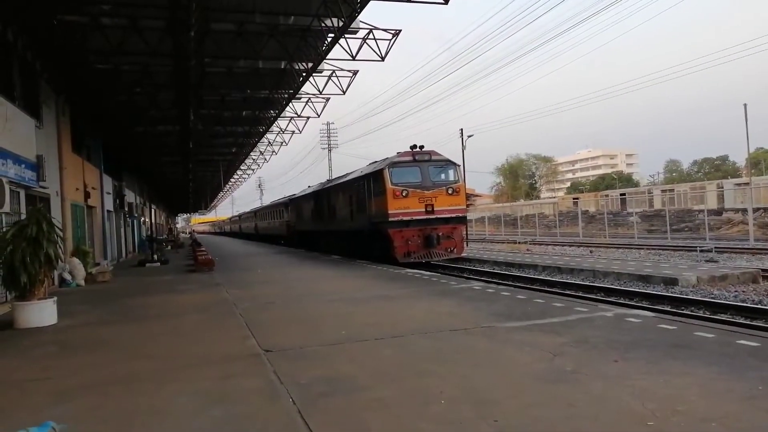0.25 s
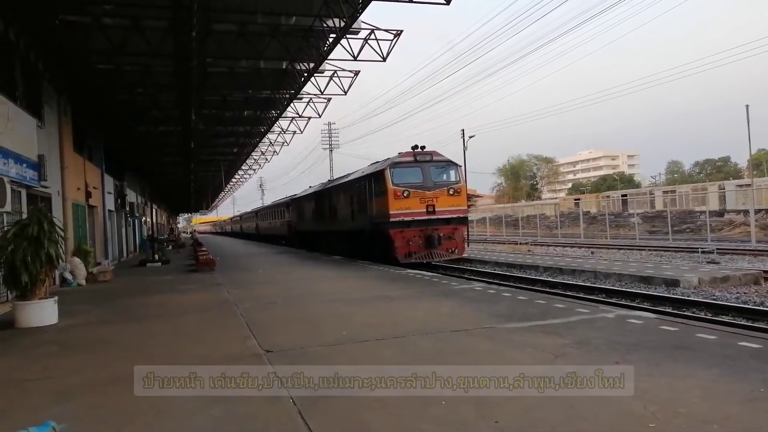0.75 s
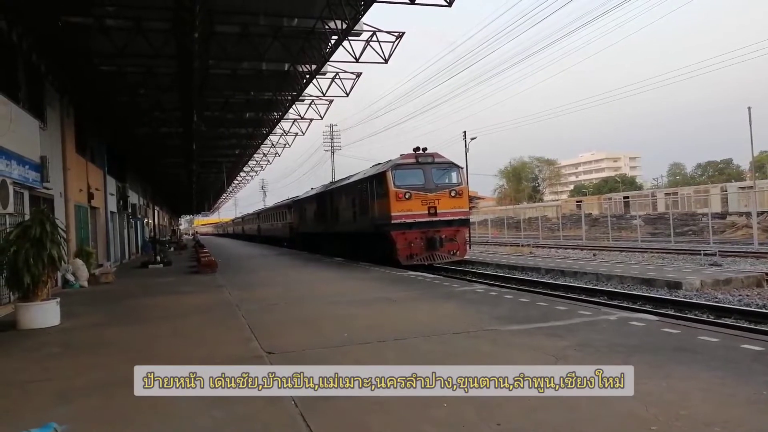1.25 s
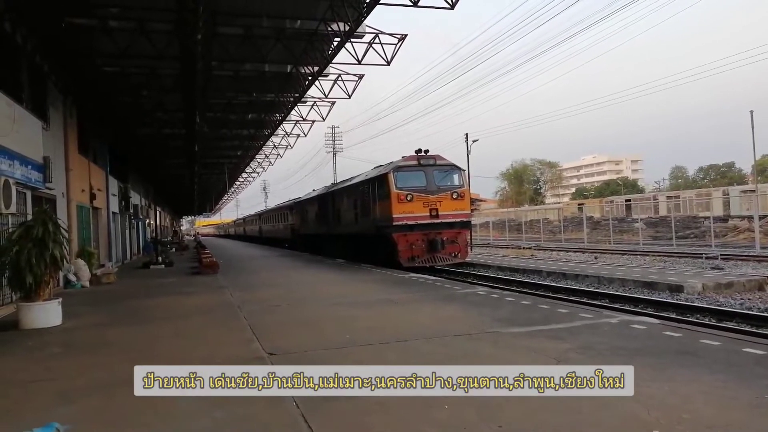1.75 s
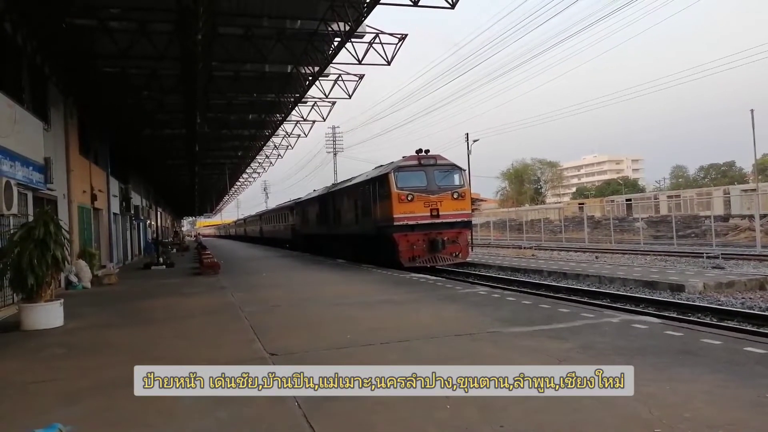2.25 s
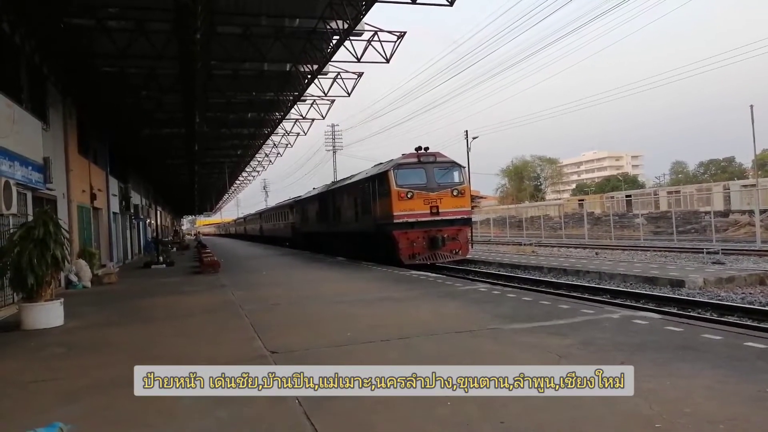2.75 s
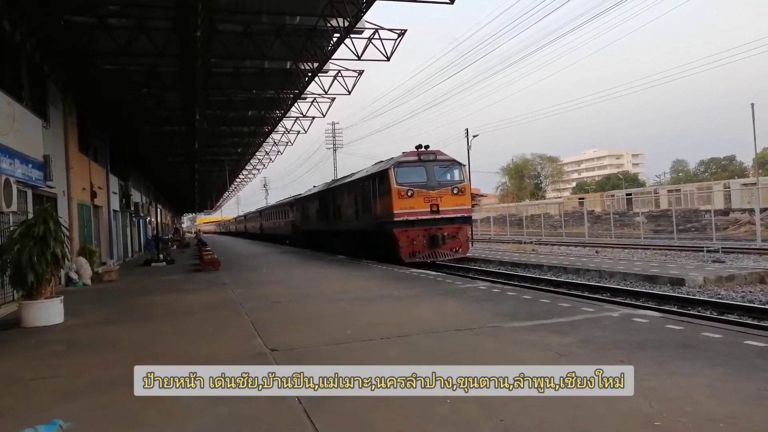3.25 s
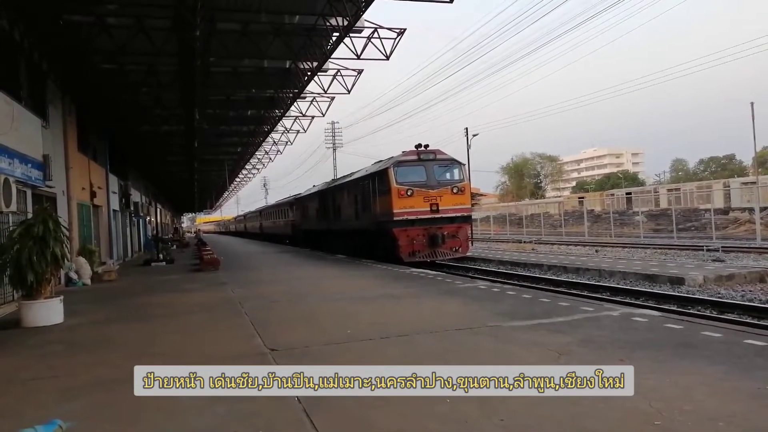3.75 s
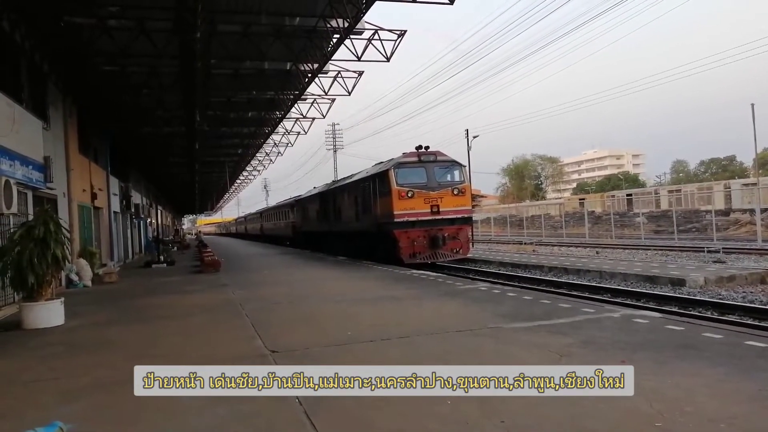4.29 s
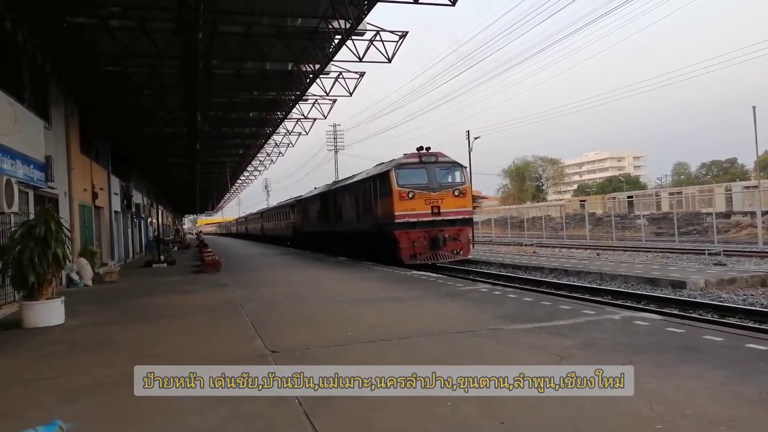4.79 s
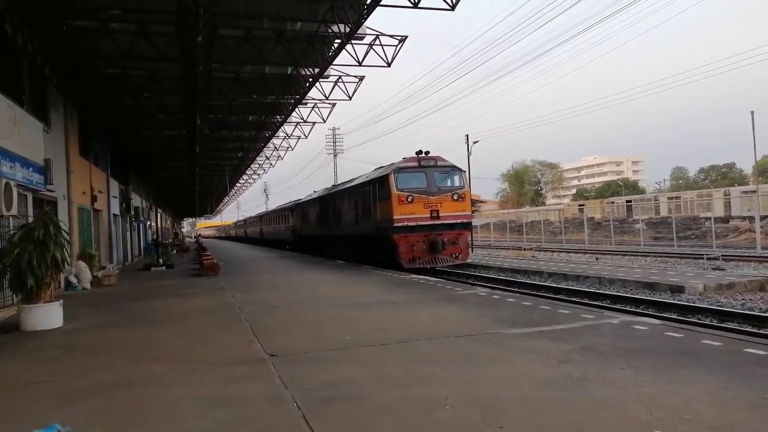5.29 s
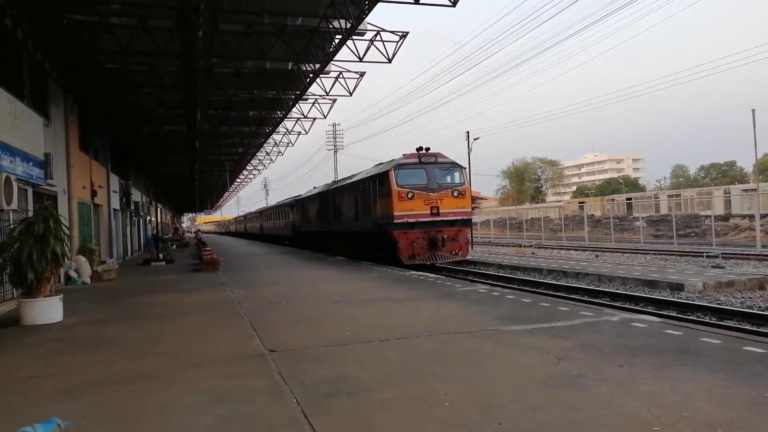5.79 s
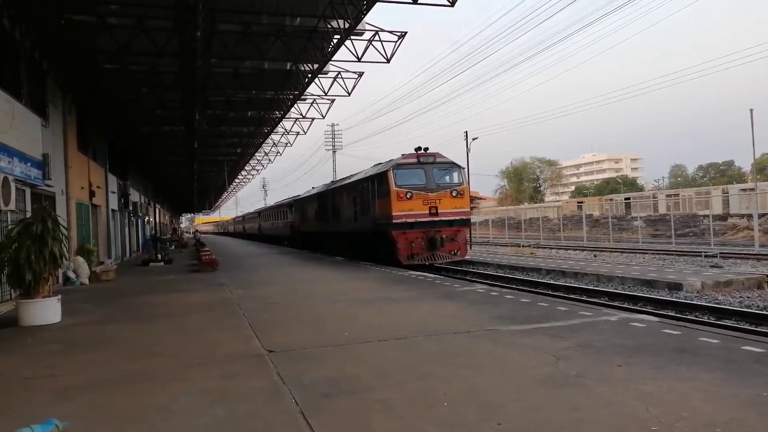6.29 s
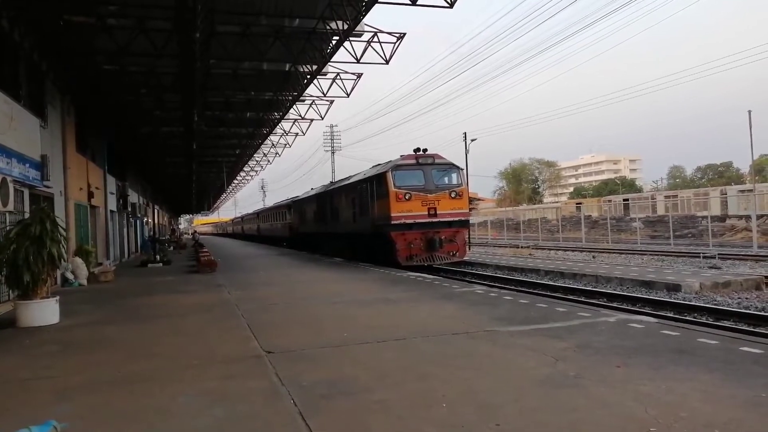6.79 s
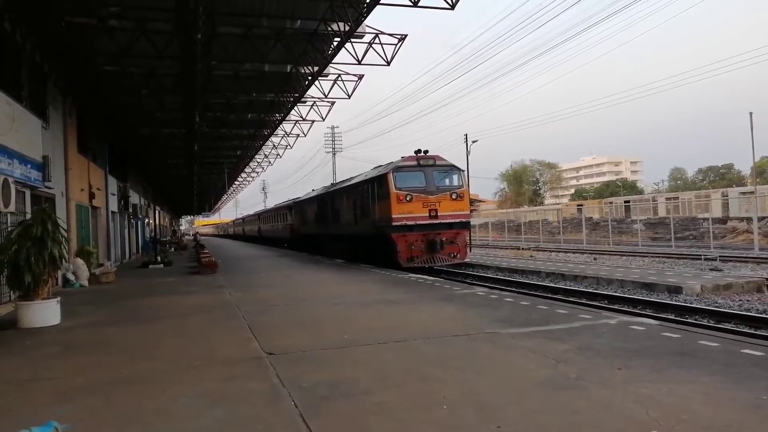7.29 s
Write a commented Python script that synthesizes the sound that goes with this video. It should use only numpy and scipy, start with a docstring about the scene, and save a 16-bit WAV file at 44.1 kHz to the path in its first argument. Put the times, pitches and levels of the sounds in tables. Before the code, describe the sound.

Loud locomotive horn bends down in pitch and breaks off ringing; a diesel engine rumbles slowly closer, air valve spitting, then revving with a thin whine.

```python
"""A loud air horn, already sounding, goes flat twice, breaks off and rings on under a station roof.
The recorder's gain, held down by the horn, recovers; a sixteen-cylinder diesel-electric locomotive throbs
through, rolling slowly nearer, and begins to speed up. An air valve spits three times, once faintly; air
leaks; a thin whine sets in. Horn: summed partials. Engine: filtered pulses and noise, with gear tones.
Air: shaped noise and breathy tones. Whine: narrow noise bands."""
import sys
import numpy as np
from scipy import signal
from scipy.fft import rfft, irfft, next_fast_len
from scipy.io import wavfile
from scipy.ndimage import uniform_filter1d, minimum_filter1d, map_coordinates

SR = 44100
rng = np.random.default_rng(int(sys.argv[2]) if len(sys.argv) > 2 else 0)


def wav_out(sig):
    """Save sig, one row per channel (or a flat mono array), as 16-bit PCM at SR to the path in sys.argv[1]."""
    wavfile.write(sys.argv[1], SR, np.round(np.clip(np.atleast_2d(sig).T, -1, 1) * 32767).astype(np.int16))


N = 332514
TIME = np.arange(N) / SR

# Table levels are relative; the functions apply further gains.
# roof reverberation: hz, t60_s
ROOF_T60 = [(620, 0.74), (1200, 1), (2000, 0.9), (4300, 0.6), (8000, 0.41), (14000, 0.2)]
# right microphone against the left: hz, gain_db, lag_ms
RIGHT_MIC = [(49.4, 1, .4), (94, 0.4, 0.52), (203, 1, 0.68), (304, -1.5, 0.91), (356, -0.5, 0.73),
             (596, -6, 0.75), (663, -12, 0.49), (1260, -9, 0.76), (2030, -16.5, 0.62), (3020, -19.5, 0.66),
             (5030, -22, 0.55), (8250, -28.5, 0.68), (11700, -34, 0.073)]

# valve outlet noise: hz, level_db_per_hz
SPIT_HISS = [(1500, -86), (2600, -78), (3400, -66.5), (4500, -68.5), (5600, -79), (7000, -67.5),
             (8200, -67), (9500, -72.5), (11000, -81.5), (13000, -86), (14500, -100)]
# valve spits: start_s, level_db, opening_s, hold_s, t60_s, pipe_ring_db, chirp_db
SPITS = [(2.113, -0.5, 0.009, 0.064, 0.7, 5, -9), (5.33, -13, .06, .07, .5, -14, -20),
         (5.925, -2.5, 0.004, 0.036, 0.77, -11, 0.5)]
# outlet pipe resonances: hz, gain_db
PIPE_RINGS = [(3470, -51), (3810, -43), (4530, -41), (5480, -50)]
# valve seat chirp as it snaps open: hz, gain_db, width_hz
SEAT_CHIRP = [(3540, -27, 330), (7200, -37, 800), (11300, -37, 600)]
# air leak noise: hz, level_db_per_hz
LEAK_HISS = [(2000, -82), (3400, -85), (4500, -78.5), (5600, -81.5), (7000, -80), (8200, -82.5),
             (9500, -86.5), (11000, -99), (13000, -103), (14500, -105)]
# faint leak whistles: hz, gain_db
LEAK_WHISTLES = [(1130, -38), (8000, -52.5), (9600, -54)]

# cylinders in firing order: strength_db, manifold_lag_ms
CYLINDERS = [(-0.2, 3.9), (2.3, -0.2), (-4.3, 5.1), (1.5, 3.8), (1.0, -1.4), (0.3, 1.0), (2.1, 3.9),
             (-7.1, 3.4), (1.2, 5.9), (1.6, -0.7), (-15.0, 4.5), (-16.2, 5.7), (0.4, 3.8), (-8.3, 3.6),
             (-3.3, 0.5), (0.0, 4.1)]
# spectrum of one exhaust pulse: hz, gain_db
EXHAUST_PULSE = [(12.0, -70), (25.0, -48), (47.0, -35), (75.0, -30), (95.0, -17), (125.0, -30),
                 (160.0, -33.5), (210.0, -50), (280.0, -50), (400.0, -55), (700, -79)]
# turbulent exhaust gas: hz, level_db_per_hz
EXHAUST_GAS = [(12, -78), (25, -63), (45, -48), (60, -51.5), (75, -43.5), (100, -49.5), (140, -50.5),
               (200, -56), (300, -61), (500, -74)]
# fans, gears and engine casing: hz, level_db_per_hz
MACHINERY = [(120, -56.5), (250, -52), (350, -54), (430, -60), (520, -65), (650, -60.5), (900, -59.5),
             (1300, -65.5), (1850, -59), (2500, -63.5), (3100, -75), (4000, -74), (5300, -83.5),
             (9300, -87.5), (10500, -99), (14000, -116)]
# gear train tones: multiple_of_firing_rate, level_db
GEARS = [(4.315, -46.5), (3.0, -50.5)]
# deepest rumble: time_s, gain_db
DEEP_RUMBLE = [(0, -12), (1.7, 0), (2.7, 0.5), (4.2, -4), (4.9, -6.5), (5.6, -4), (6.4, -2.5), (7.5, -2)]
# exhaust surges: peak_s, level_db, half_length_s
SURGES = [(1.613, 0.5, 0.25), (4.204, 2, 0.048), (6.442, 3.5, 0.057), (6.912, 4, 0.16)]
# booms at the octave of the firing rate: peak_s, level_db, half_length_s
BOOMS = [(1.388, -33, 0.11), (2.813, -30, 0.52), (5.454, -31.5, 0.39)]

# horn partials at full pressure: multiple, level_db
HORN_PARTIALS = [(1, -13), (2, -26.5), (3, -16.3), (4, -17.5), (5, -30), (6, -26), (7, -17), (8, -33),
                 (9, -43), (10, -48), (11, -39), (12, -40.5), (13, -50), (14, -47), (15, -47), (16, -52),
                 (17, -54), (18, -60), (19, -63), (20, -59), (21, -70), (22, -68), (23, -64)]
# timbre change at low pressure: hz, change_db
HORN_SLACK = [(620, 2), (1240, 2), (1860, 1), (2480, -11), (3100, -12), (3720, 0), (4340, -10.5),
              (5000, -10), (5600, 0), (6200, -3), (6820, -13), (7440, -3), (8060, 8), (8680, -14),
              (9300, -2), (11000, -3), (14000, 4)]
# timbre change as the reed stalls: hz, change_db
HORN_STALL = [(620, 6.5), (1240, 11.5), (1860, 4), (2480, 20), (3100, 29), (3720, -2), (4340, 1), (5600, 4),
              (7500, 9), (14000, 9.5)]
# air rushing through the horn: hz, level_db_per_hz
HORN_AIR = [(300, -99), (700, -71), (1300, -73.5), (2000, -65), (3300, -72.5), (4300, -71), (6000, -74.5),
            (8000, -73), (9500, -83.5), (10500, -102), (14000, -107)]
# spells of throttled horn air: start_s, end_s
THROTTLED = [(0.508, .648), (.863, 1.2)]
# horn returned by distant buildings: delay_s, level_db, loss_db_per_octave
FAR_ECHOES = [(.64, -42, 4), (1.12, -52, 12), (1.46, -45, 14)]

WHINE_START_S, WHINE_ATTACK_S, WHINE_DB = 6.95, 0.43, -32.5
WHINE_HZ, WHINE_FALL_HZ_PER_S = 7370, 480

RING_T60_S = 0.95
CHIRP_PEAK_S, CHIRP_HALF_LENGTH_S = 0.012, 0.013  # peak is after valve opening
LEAK_START_S, LEAK_ATTACK_S, LEAK_DB, LEAK_FADE_DB_PER_S = 5.11, 0.29, 2.5, 5

# engine: firings per s, then their steady increase
IDLE_FIRINGS_PER_S, SPEED_UP_START_S, SPEED_UP_FIRINGS_PER_S2 = 94.16, 6.38, 6.8
# growth while nearing, and per extra firing per s
EXHAUST_DB, EXHAUST_NEARING_DB_PER_S, EXHAUST_DB_PER_RATE = -0.46, 0.018, 0.62
MACHINERY_DB, MACHINERY_NEARING_DB_PER_S, MACHINERY_DB_PER_RATE = -1.72, 0.2, 0.21
# share of a surge in the machinery; extra share in the deepest rumble
SURGE_MACHINERY_SHARE, SURGE_DEEP_SHARE = 0.28, 1.2

HORN_HZ, HORN_DB, UNDERTONE_DB = 620.1, 21.5, -56.5
# throttled air: pitch sinks ever more slowly, then springs back
SAG_LIMIT_HZ, DRAIN_S, REFILL_S = 97, 0.45, 0.032
WEAK_BELOW_SAG_HZ, WEAK_DB_PER_HZ = 20.5, 1.13  # the reed weakens beyond this flatness
STALL_S, STALL_LENGTH_S = 0.943, 0.11
# last break: pitch drops, partials near one pitch yelp, the horn stops
BREAK_S, BREAK_RISE_S, BREAK_DROP_HZ = 1.114, 0.017, 18.4
YELP_DB, YELP_HZ, YELP_FALL_DB_PER_OCTAVE = 21.5, 1520, 32
STOP_S, STOP_DB_PER_S = 1.143, 898
# flutter at low pressure; depth is full from the given multiple up
FLUTTER_DB, FLUTTER_PER_S, FLUTTER_FULL_MULTIPLE = 5, 22, 9
# ragged station wall
WALL_DELAY_S, WALL_DB, WALL_T60_S, WALL_LOSS_DB_PER_OCTAVE = 0.27, -23, 0.36, 2.5

CUTOFF_HZ = 15000


def from_db(db):
    """Decibels to amplitude gain."""
    return 10 ** (np.asarray(db) / 20)


def at_hz(points, hz, axis=1):
    """Interpolate a table column on a log-frequency axis."""
    points = np.array(points)
    return np.interp(np.log(np.maximum(hz, 1)), np.log(points[:, 0]), points[:, axis])


def ramp(start_s, length_s, t=TIME):
    """Straight rise from 0 to 1."""
    return np.clip((t - start_s) / length_s, 0, 1)


def swell(peak_s, half_length_s):
    """Gaussian bump of height 1."""
    return np.exp(-((TIME - peak_s) / half_length_s) ** 2)


def coloured(x, spectrum):
    """Filter by a spectrum that falls 24 dB per octave further beyond its ends."""
    size = next_fast_len(len(x) + 8192)
    hz = np.maximum(np.arange(size // 2 + 1) * SR / size, 1)
    ends = np.minimum(1, np.minimum(hz / spectrum[0][0], spectrum[-1][0] / hz)) ** 4
    gain = from_db(at_hz(spectrum, hz)) * ends
    return irfft(rfft(x, size) * gain, size)[:len(x)]


def noise(spectrum):
    """Gaussian noise shaped to the given level per Hz."""
    return coloured(rng.standard_normal(N) * np.sqrt(SR / 2), spectrum)


def drift(rate_per_s, size=N):
    """Smooth random curve of spread 1, splined through two knots per cycle of the rate."""
    knots = rng.standard_normal(int(size / SR * 2 * rate_per_s) + 4)
    position = np.arange(size) / SR * 2 * rate_per_s
    slow = map_coordinates(knots, [position], order=3, mode="nearest")
    return slow / slow.std()


def narrow_tone(hz, width_hz):
    """Breathy tone: a carrier with wandering strength and phase, rms about 0.71."""
    phase = 2 * np.pi * np.cumsum(hz * np.ones(N)) / SR
    in_phase = drift(width_hz / 2) * np.cos(phase)
    quadrature = drift(width_hz / 2) * np.sin(phase)
    return (in_phase + quadrature) / np.sqrt(2)


def roof_echo(tone, hz, first_s=0.013):
    """Dense decaying reflections under the roof, as a unit-energy noise response."""
    t = np.arange(2 * SR) / SR
    decay = from_db(-60 * t / at_hz(ROOF_T60, hz))
    response = rng.standard_normal(len(t)) * decay * (t > first_s)
    return signal.fftconvolve(tone, response / np.linalg.norm(response))[:len(tone)]


def wall_echo(tone):
    """Late, smeared cluster of wall reflections that swells and dies, unit energy."""
    t = np.arange(SR // 2) / SR
    response = rng.standard_normal(len(t)) * t * from_db(-60 * t / WALL_T60_S)
    response = np.pad(response / np.linalg.norm(response), (int(WALL_DELAY_S * SR), 0))
    return signal.fftconvolve(tone, response)[:len(tone)]


def whine(width_hz=420, skirt_hz=850, skirt_db=-5):
    """Narrow hiss band with soft skirts; swells, then slides down as the locomotive nears."""
    hz = WHINE_HZ - WHINE_FALL_HZ_PER_S * np.maximum(TIME - WHINE_START_S, 0)
    band = narrow_tone(hz, width_hz) + from_db(skirt_db) * narrow_tone(hz, skirt_hz)
    return from_db(WHINE_DB) * ramp(WHINE_START_S, WHINE_ATTACK_S) * band


def valve_spits(sputter_db=1.0, ring_width_hz=150):
    """A valve snaps open with a chirp, blows briefly and runs empty while its outlet pipe rings on."""
    blast, ringing, snap = 0, 0, 0
    for start_s, level_db, opening_s, hold_s, t60_s, ring_db, chirp_db in SPITS:
        opened = from_db(level_db) * ramp(start_s, opening_s)
        emptying_s = np.maximum(TIME - start_s - hold_s, 0)
        blast = blast + opened * from_db(-60 * emptying_s / t60_s)
        ringing = ringing + opened * from_db(ring_db - 60 * emptying_s / RING_T60_S)
        click = swell(start_s + CHIRP_PEAK_S, CHIRP_HALF_LENGTH_S)
        snap = snap + opened * from_db(chirp_db) * click
    rings = sum(from_db(db) * narrow_tone(hz, ring_width_hz) for hz, db in PIPE_RINGS)
    chirp = sum(from_db(db) * narrow_tone(hz, width_hz) for hz, db, width_hz in SEAT_CHIRP)
    sputter = from_db(sputter_db * drift(30))
    return sputter * (blast * noise(SPIT_HISS) + ringing * rings) + snap * chirp


def air_leak(whistle_width_hz=110):
    """Leaking air hisses and whistles faintly, opening and then losing pressure."""
    whistles = sum(from_db(db) * narrow_tone(hz, whistle_width_hz) for hz, db in LEAK_WHISTLES)
    fading_s = np.maximum(TIME - LEAK_START_S - LEAK_ATTACK_S, 0)
    flow = ramp(LEAK_START_S, LEAK_ATTACK_S) * from_db(LEAK_DB - LEAK_FADE_DB_PER_S * fading_s)
    return flow * (noise(LEAK_HISS) + whistles)


def firing_pulses(firings, rate_per_s, uneven_db=1.18, jitter_s=0.00027):
    """One impulse per firing, uneven by cylinder and chance; also firing samples and strengths."""
    at = np.flatnonzero(np.diff(np.floor(firings)))
    number = np.arange(1, len(at) + 1)
    strength_db, lag_ms = np.array(CYLINDERS)[number % len(CYLINDERS)].T
    chance = rng.standard_normal((len(at), 2))
    delay_s = lag_ms / 1000 + jitter_s * chance[:, 0]
    when = np.clip(at + (SR * delay_s).astype(int), 0, N - 1)
    pulses = np.zeros(N)
    # dividing by the rate keeps the mean flow steady
    pulses[when] = from_db(strength_db + uneven_db * chance[:, 1]) * SR / rate_per_s[at]
    return pulses, at, strength_db


def engine(gas_throb=0.092, casing_flutter_db=0.51, start_firings=0.3, deep_hz=52):
    """Exhaust pulses lope with weak and strong cylinders, over gas and machinery noise and gear tones."""
    extra_rate = SPEED_UP_FIRINGS_PER_S2 * np.maximum(TIME - SPEED_UP_START_S, 0)
    rate_per_s = IDLE_FIRINGS_PER_S + extra_rate
    firings = np.cumsum(rate_per_s) / SR + start_firings
    surge_db = sum(db * swell(peak_s, half_s) for peak_s, db, half_s in SURGES)
    exhaust_db = EXHAUST_DB + EXHAUST_NEARING_DB_PER_S * TIME
    exhaust_db = exhaust_db + EXHAUST_DB_PER_RATE * extra_rate + surge_db
    machinery_db = MACHINERY_DB + MACHINERY_NEARING_DB_PER_S * TIME
    machinery_db = machinery_db + MACHINERY_DB_PER_RATE * extra_rate + SURGE_MACHINERY_SHARE * surge_db
    deep_db = np.interp(TIME, *np.transpose(DEEP_RUMBLE)) + SURGE_DEEP_SHARE * surge_db

    pulses, at, strength_db = firing_pulses(firings, rate_per_s)
    gas = noise(EXHAUST_GAS) * from_db(gas_throb * np.interp(TIME, at / SR, strength_db))
    exhaust = coloured(pulses, EXHAUST_PULSE) + gas
    # as the stack moves, reflections favour or cancel the deepest rumble and the firing octave
    deep = signal.sosfiltfilt(signal.butter(3, deep_hz, fs=SR, output="sos"), exhaust)
    exhaust = exhaust + (from_db(deep_db) - 1) * deep
    boom_gain = sum(from_db(db) * swell(peak_s, half_s) for peak_s, db, half_s in BOOMS)
    boom = boom_gain * np.sqrt(2) * np.sin(2 * np.pi * 2 * firings)

    casing = noise(MACHINERY) * from_db(casing_flutter_db * drift(25))
    gears = 0
    for multiple, level_db in GEARS:
        tone = np.sqrt(2) * np.sin(2 * np.pi * multiple * firings)
        gears = gears + from_db(level_db + 2.2 * drift(3.4)) * tone
    return from_db(exhaust_db) * exhaust + boom + from_db(machinery_db) * (casing + gears)


def horn_sag_hz(t):
    """Flatness of the horn: exponential drain while throttled, quick refill after."""
    sag_hz = 0
    for start_s, end_s in THROTTLED:
        drained = 1 - np.exp(-np.clip(t - start_s, 0, end_s - start_s) / DRAIN_S)
        refill = np.exp(-np.maximum(t - end_s, 0) / REFILL_S)
        sag_hz = sag_hz + SAG_LIMIT_HZ * drained * refill
    return sag_hz


def horn(roof_db=-6.5, slack_hz=31.3, slack_curve=0.28, far_waver_db=-2.5, waver=0.00008,
         air_db=-2, air_slack_db=-6, air_roof_db=-6):
    """Reed horn: as air pressure sags it goes flat and loses its edge; roof, wall and buildings echo it."""
    t = np.arange(-SR, 3 * SR) / SR  # starts 1 s early so the echoes are already ringing
    sag_hz = horn_sag_hz(t)
    stall = ramp(STALL_S, STALL_LENGTH_S, t)
    breaking = ramp(BREAK_S, BREAK_RISE_S, t)
    pitch_hz = HORN_HZ - sag_hz - BREAK_DROP_HZ * breaking
    flow_db = HORN_DB - STOP_DB_PER_S * np.maximum(t - STOP_S, 0)
    blow_db = flow_db - WEAK_DB_PER_HZ * np.maximum(sag_hz - WEAK_BELOW_SAG_HZ, 0)
    slack = np.clip(sag_hz / slack_hz, 0, 1.3) ** slack_curve
    slack = uniform_filter1d(slack, size=1500, origin=500)  # timbre lags pitch slightly
    phase = 2 * np.pi * np.cumsum(pitch_hz * (1 + waver * drift(9.44, len(t)))) / SR
    # undertone at 1.5 times the pitch
    out = np.sqrt(2) * from_db(blow_db + UNDERTONE_DB) * np.cos(phase + phase / 2)
    far_gain = from_db(far_waver_db * drift(5.1, len(t)))

    for k, level_db in HORN_PARTIALS:
        hz = k * HORN_HZ
        octaves = np.log2(k)
        # the flared bell delays each partial differently, rounding the wave's peaks
        wave = np.exp(1j * (k * phase + 0.55 * k * k + 0.4))
        yelp_db = max(YELP_DB - YELP_FALL_DB_PER_OCTAVE * abs(np.log2(hz / YELP_HZ)), 0)
        flutter_depth_db = FLUTTER_DB * min(k / FLUTTER_FULL_MULTIPLE, 1) ** 2
        flutter_db = flutter_depth_db * drift(FLUTTER_PER_S, len(t))
        partial_db = blow_db + level_db + slack * (at_hz(HORN_SLACK, hz) + flutter_db)
        partial_db = partial_db + stall * at_hz(HORN_STALL, hz) + breaking * yelp_db
        direct = from_db(partial_db) * wave
        wall_gain = from_db(WALL_DB - WALL_LOSS_DB_PER_OCTAVE * octaves)
        echo = from_db(roof_db) * roof_echo(direct, hz) + wall_gain * wall_echo(direct)
        # on the held note the echo is a quarter cycle off; it beats once the pitch bends
        echo = echo * -1j * np.exp(-1j * np.angle(echo[SR] / direct[SR]))
        far = 0
        for delay_s, far_db, loss_db in FAR_ECHOES:
            delayed = np.interp(t - delay_s, t, direct.real, left=0)
            far = far + from_db(far_db - loss_db * octaves) * delayed
        out = out + np.sqrt(2) * ((direct + echo).real + far_gain * far)

    air_flow_db = np.interp(TIME, t, flow_db + air_slack_db * slack) + air_db
    air = from_db(air_flow_db) * noise(HORN_AIR)
    tones = np.pad(out[SR:], (0, N - len(out) + SR))
    return tones + air + from_db(air_roof_db) * roof_echo(air, HORN_HZ)


def scene():
    """Sum the locomotive's sources; the right microphone gets them muffled and late."""
    left = whine() + valve_spits() + air_leak() + engine() + horn()
    size = next_fast_len(N + SR)
    hz = np.arange(size // 2 + 1) * SR / size
    lag_s = at_hz(RIGHT_MIC, hz, axis=2) / 1000
    response = from_db(at_hz(RIGHT_MIC, hz)) * np.exp(-2j * np.pi * hz * lag_s)
    right = irfft(rfft(left, size) * response, size)[:N]
    return np.array([left, right])


def record(dry, ceiling_db=-7.0, release_db_per_s=53, hold_s=0.046):
    """Gain control from the left level: cut above a ceiling, hold, recover; round peaks, cut the top."""
    level_db = 10 * np.log10(uniform_filter1d(dry[0] ** 2, size=900) + 1e-12)
    excess_db = np.maximum(level_db - ceiling_db, 0)
    half_hold = max(int(hold_s * SR / 2), 1)
    # running maximum over the past hold time
    held_db = -minimum_filter1d(-excess_db, 2 * half_hold + 1, origin=half_hold)
    release_db = release_db_per_s * TIME
    cut_db = np.maximum.accumulate(held_db + release_db) - release_db
    out = dry * from_db(-uniform_filter1d(cut_db, size=600))
    out = out / (1 + (out / 0.99) ** 40) ** (1 / 40)
    top_cut = signal.firwin(numtaps=301, cutoff=CUTOFF_HZ, window=("kaiser", 9), fs=SR)
    return signal.fftconvolve(out, top_cut[None], mode="same")


dry = scene()
out = record(dry)
wav_out(out)
```